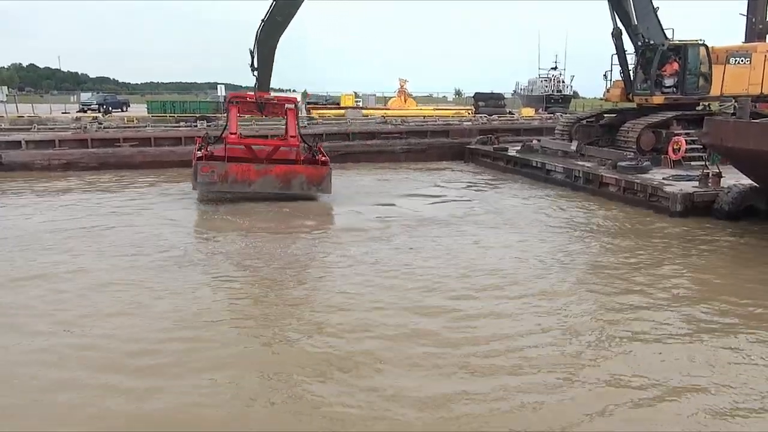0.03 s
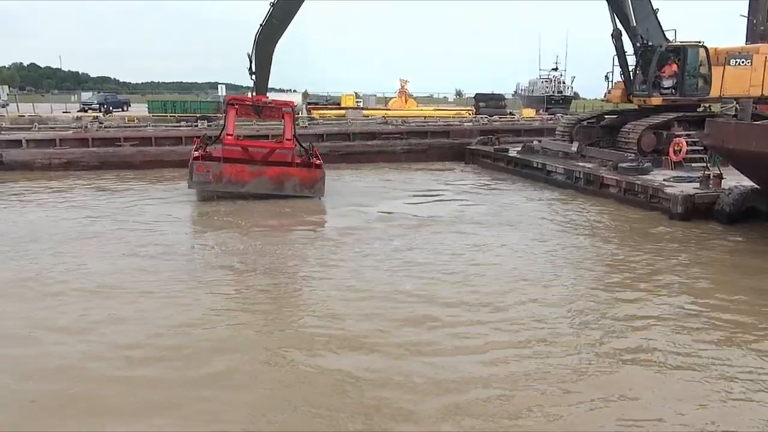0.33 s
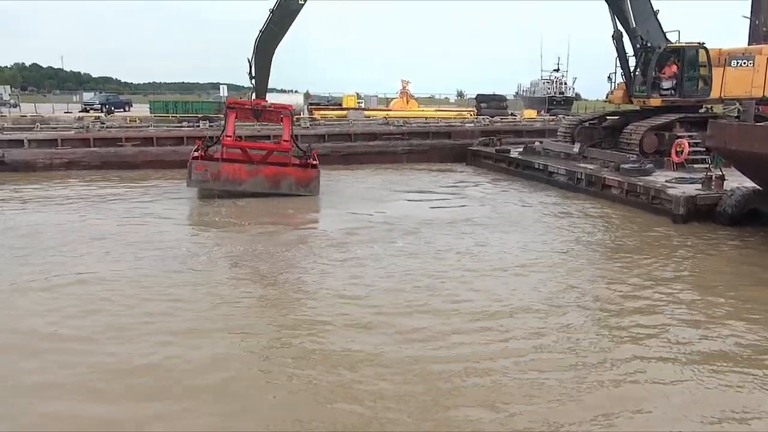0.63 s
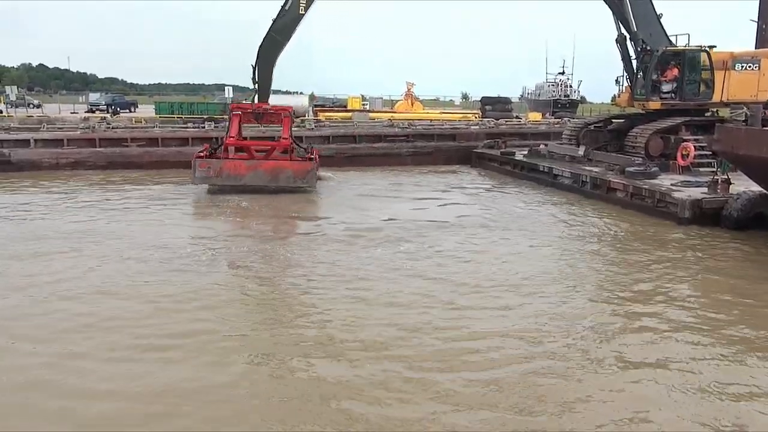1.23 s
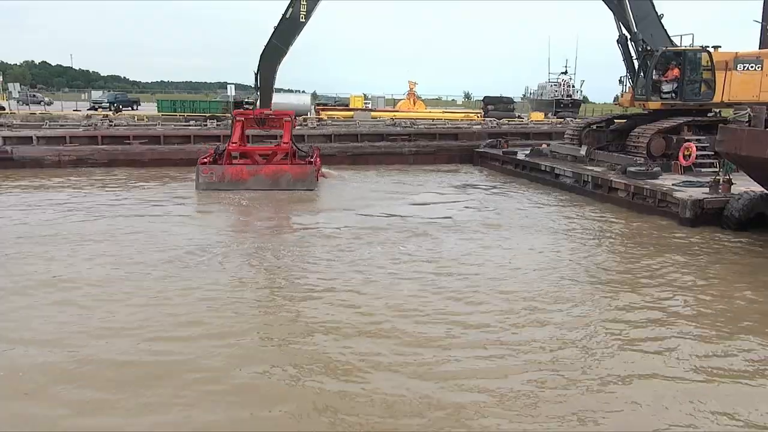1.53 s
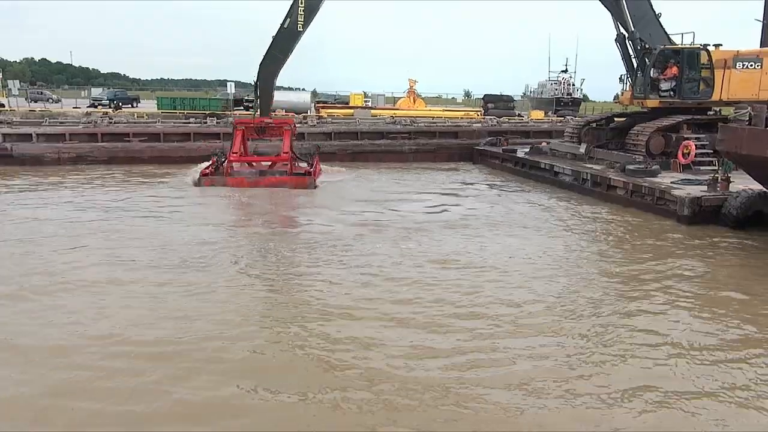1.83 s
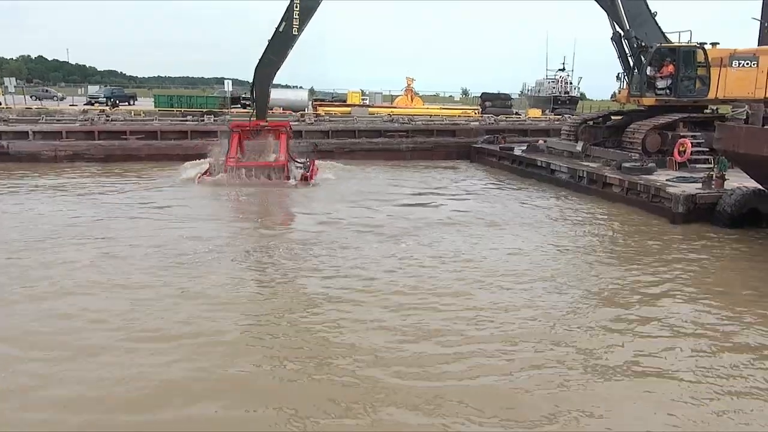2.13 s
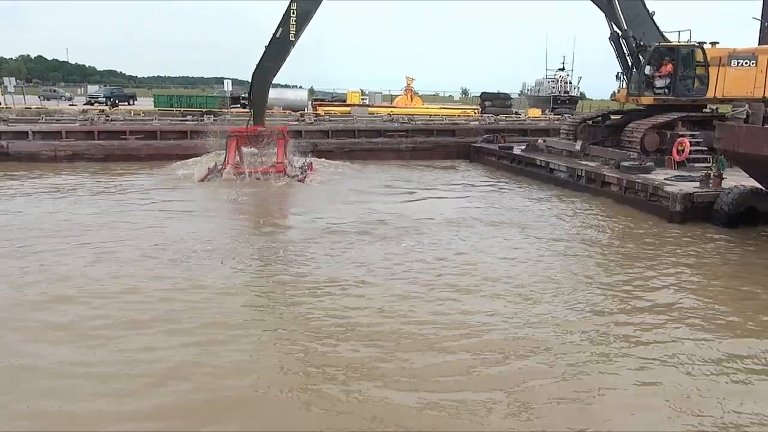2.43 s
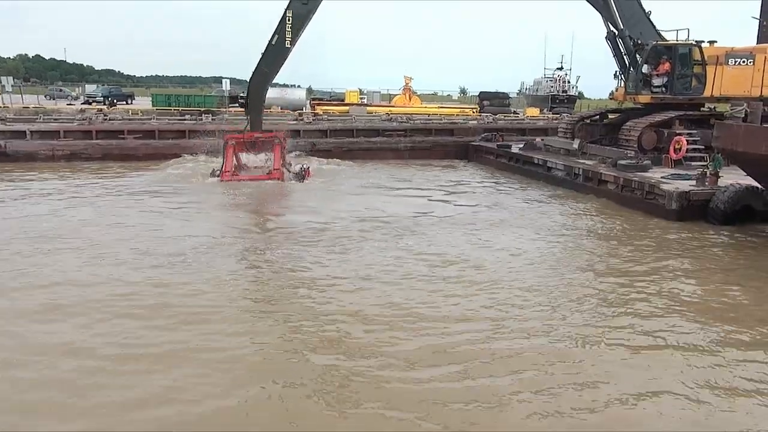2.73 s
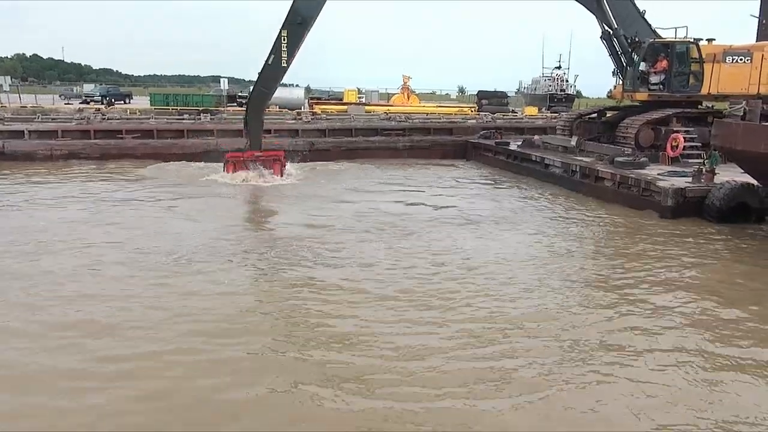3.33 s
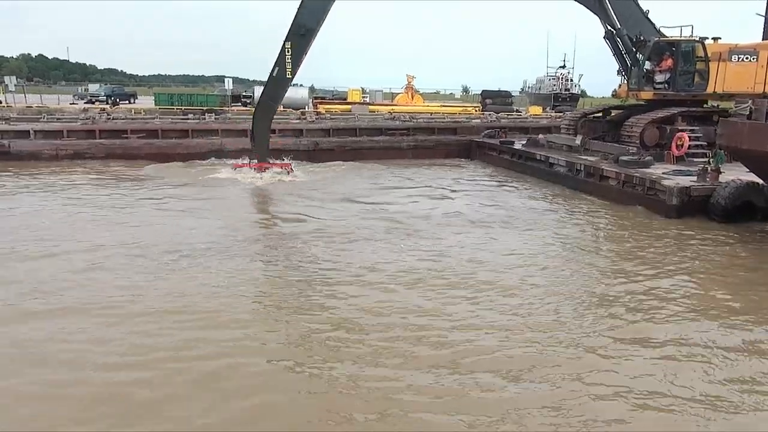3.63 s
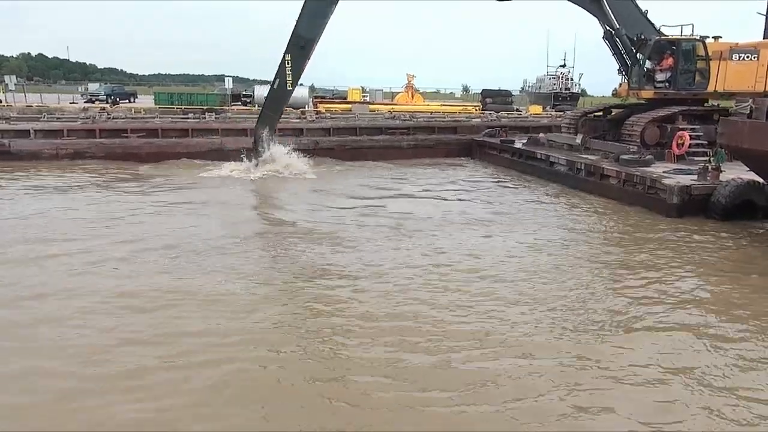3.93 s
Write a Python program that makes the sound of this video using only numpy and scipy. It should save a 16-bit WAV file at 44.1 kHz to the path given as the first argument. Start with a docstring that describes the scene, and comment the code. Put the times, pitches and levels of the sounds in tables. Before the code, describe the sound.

An excavator engine drones steadily across the water throughout, with a fan hum and a thin, wavering hydraulic whine. At about 2 seconds its bucket slaps the surface with a rush of spray. The water churns and bubbles softly, then gives a hollow, splashing gulp near 3.2 seconds and a smaller surge around 3.8. Light wind rumbles on the dull microphone, with a few soft low thumps.

```python
"""An excavator on a barge lowers its dredging bucket into a harbour, heard from across the water.
One slowly rising engine speed drives the exhaust drone, the fan hum and the hydraulic pump's whine.
About two seconds in the bucket slaps the surface, and a second later it gulps as it goes under:
spray rushes, bubbles and trapped air ring. A light wind rumbles on the dull stereo camera microphone."""
import sys
import numpy as np
from scipy import signal
from scipy.fft import rfft, irfft
from scipy.io import wavfile
from scipy.ndimage import uniform_filter1d

SR = 44100
rng = np.random.default_rng(int(sys.argv[2]) if len(sys.argv) > 2 else 0)


def file_out(sig):
    """Save sig as 16-bit WAV at sys.argv[1]."""
    # one column per channel
    cols = np.atleast_2d(sig).T
    # limit, then scale
    lim = np.clip(cols, -1, 1)
    pcm = np.round(lim * 32767).astype(np.int16)
    wavfile.write(sys.argv[1], SR, pcm)


N = 176400
T = np.arange(N) / SR
HZ = np.fft.rfftfreq(N, 1 / SR)

# left-right likeness of sound arriving over the water: f/Hz, coherence/0-1
AIR_COHERENCE = [(100, .85), (180, .85), (320, .94), (550, .98), (900, .99), (1600, .96), (2600, .55),
                 (6000, .4), (12000, .2)]
# spray off the bucket: f/Hz, relative density/dB
SPRAY_SPECTRUM = [(60, -50), (180, -48), (400, -58), (800, -59), (1400, -66.5), (2500, -74.5), (4000, -77),
                  (6000, -77), (8000, -86.5), (14000, -93)]


def amp(db):
    """Decibels to gain."""
    return 10 ** (np.asarray(db) / 20)


def unit(x):
    """Scales to rms 1."""
    return x / np.sqrt(np.mean(x ** 2) + 1e-20)


def curve(points, column=1):
    """One column of a time table at every sample."""
    table = np.array(points)
    return np.interp(T, table[:, 0], table[:, column])


def colour(points, hz, column=1):
    """One column of a frequency table, interpolated on a log axis."""
    table = np.array(points)
    return np.interp(np.log(hz + 1), np.log(table[:, 0] + 1), table[:, column])


def wander(rate_hz):
    """Random drift of rms 1, mostly slower than rate_hz."""
    return unit(irfft(rfft(rng.standard_normal(N)) * (HZ > 0) / (1 + (HZ / rate_hz) ** 2), N))


def noise(spectrum, coherence, patchy_db):
    """Stereo noise of a given spectrum, flickering in patches of time and frequency."""
    cells = signal.stft(rng.standard_normal((2, N)), nperseg=512)[2]
    patches = uniform_filter1d(rng.standard_normal(cells.shape[1:]), size=6, axis=0)
    patches = unit(uniform_filter1d(patches, size=8, axis=1))
    left, other = rfft(signal.istft(cells * amp(patchy_db * patches), nperseg=512)[1][:, :N])
    alike = colour(coherence, HZ)
    right = alike * left + np.sqrt(1 - alike ** 2) * other
    return irfft(np.array([left, right]) * amp(colour(spectrum, HZ)), N) * np.sqrt(SR / 2)


def partial(cycles, level_db, fade_db, fade_hz, rough, rough_hz):
    """A machine tone with a rough skirt, fading in and out over the water."""
    skirt = 1 + rough * (wander(rough_hz) + 1j * wander(rough_hz))
    tone = skirt * np.exp(2j * np.pi * (cycles + rng.random()))
    return np.sqrt(2) * tone.real * amp(level_db + fade_db * wander(fade_hz))


def burst(swell, resonances):
    """A swell of turbulence through resonances: f/Hz, width/Hz, level/dB."""
    body = sum(amp(db) / (1 + (2 * (HZ - centre) / width) ** 2) for centre, width, db in resonances)
    ring = irfft(rfft(rng.standard_normal(N)) * body, N) * swell
    return ring * np.linalg.norm(swell) / np.linalg.norm(ring)


def exhaust(firings):
    """The engine's firing drone, with a half order from uneven cylinders."""
    # drone: t/s, level/dB
    drone_level = [(0, -18), (.4, -17.5), (1.3, -15.5), (1.5, -18.5), (2.2, -19), (2.6, -21), (3.05, -22),
                   (3.35, -21), (3.68, -27), (3.85, -29.5), (3.96, -19), (4, -19)]
    # exhaust partials: multiple of the firing rate, level re drone/dB
    orders = [(1, 2), (2, -22.5), (3, -22), (4, -35)]
    drone = sum(partial(k * firings, curve(drone_level) + db,
                        fade_db=0.87, fade_hz=8.5, rough=0.057, rough_hz=4.6) for k, db in orders)
    return drone + partial(firings / 2, level_db=-30.5, fade_db=4.5, fade_hz=1.1, rough=0.041, rough_hz=1.8)


def gear(firings):
    """A thin gear whine that fades with the load."""
    # whine: t/s, level/dB
    whine_level = [(0, -47.5), (.35, -43.5), (.85, -64), (1.25, -46.5), (2, -63.5), (4, -55.5)]
    return partial(19 * firings, curve(whine_level), fade_db=1, fade_hz=3, rough=0.12, rough_hz=6)


def fan(blade_passes):
    """Blade hum that beats against the drone."""
    # hum: t/s, level at the blade rate/dB, level at twice that rate/dB
    hum_levels = [(0, -36.5, -33.5), (.35, -28, -36), (.8, -24, -35), (1.5, -40.5, -44), (2.1, -29, -26),
                  (2.55, -26, -37.5), (3.0, -31.5, -30.5), (3.4, -34, -32), (4, -32, -58.5)]
    # upper partials: multiple of the blade rate, level/dB
    overtones = [(3, -43), (4, -47)]
    hum = sum(partial(k * blade_passes, curve(hum_levels, column=k),
                      fade_db=0.96, fade_hz=1.1, rough=0.066 * k, rough_hz=2.4) for k in (1, 2))
    return hum + sum(partial(k * blade_passes, db, fade_db=2.5, fade_hz=0.28, rough=0.37, rough_hz=11)
                     for k, db in overtones)


def pump(strokes):
    """Piston whine of the hydraulics; its colour changes as the water takes the bucket's weight."""
    # leading partials: t/s, level of the second/dB, of the fourth/dB, of the sixth/dB
    whine_levels = [(0, -31.5, -36.5, -49.5), (.28, -32, -41, -53.5), (.48, -33, -35, -53),
                    (.75, -41.5, -37.5, -49.5), (.9, -36.5, -46.5, -50), (1.1, -34, -35.5, -44.5),
                    (1.3, -37.5, -36, -50.5), (1.6, -43, -45, -56), (1.95, -42.5, -40.5, -40),
                    (2.5, -47, -34, -45.5), (2.9, -45, -36, -48.5), (3.3, -46.5, -35.5, -50.5),
                    (3.7, -40, -38, -57), (4, -45, -32, -58)]
    # weaker partials: multiple of the piston rate, level with the bucket in air/dB, in water/dB
    weak_partials = [(1, -42.5, -39), (5, -47, -52.5), (7, -51, -59.5), (8, -55.5, -82), (12, -61.5, -62.5)]
    unloading_s = (0.67, 2.5)
    whine = sum(partial(2 * k * strokes, curve(whine_levels, column=k),
                        fade_db=0.58, fade_hz=10, rough=0.19, rough_hz=6) for k in (1, 2, 3))
    return whine + sum(partial(k * strokes, np.interp(T, unloading_s, [air_db, water_db]),
                               fade_db=2.5, fade_hz=3.7, rough=0.12, rough_hz=5.9)
                       for k, air_db, water_db in weak_partials)


def hiss():
    """A smooth hiss in the distance."""
    # hiss colour: f/Hz, relative density/dB
    spectrum = [(1000, -95), (2500, -83), (4000, -84), (6000, -88.5), (14000, -94)]
    # slow swell: t/s, gain/dB
    swell = [(0, 2.5), (.6, -0.5), (1.5, 2.5), (2.5, 2), (4, 1.5)]
    return noise(spectrum, AIR_COHERENCE, patchy_db=0.8) * amp(curve(swell))


def roar(firings, throb_depth=0.24):
    """Broad machine noise from the barge, throbbing with each firing."""
    # machine noise: f/Hz, relative density/dB
    spectrum = [(60, -52.5), (130, -51), (240, -57), (320, -51.5), (400, -63.5), (480, -65), (850, -63),
                (1100, -64), (1500, -70), (2000, -73), (2800, -88.5), (5000, -110)]
    # slow swell: t/s, gain/dB
    swell = [(0, 0.5), (.5, 0), (1.6, 0.5), (2.5, 0.5), (3.3, 1.5), (4, 1)]
    throb = 1 + throb_depth * np.cos(2 * np.pi * firings)
    return noise(spectrum, AIR_COHERENCE, patchy_db=0.78) * throb * amp(curve(swell))


def wind(gust_db=1, sides_db=(1.5, 3.5)):
    """Lumpy rumble of wind right on the microphone, stronger at the right port."""
    # rumble: f/Hz, relative density/dB
    spectrum = [(5, -68), (12, -47), (22, -40.5), (40, -42), (70, -46), (110, -51), (250, -70), (800, -120)]
    rumble = noise(spectrum, coherence=[(30, 0.5)], patchy_db=0)
    return rumble * amp(gust_db * wander(rate_hz=15)) * amp(sides_db)[:, None]


def whistles(strokes):
    """Thin hydraulic tones that come and go as the boom moves."""
    # whistles: peak t/s, half length/s, multiple of the piston rate, level/dB
    swells = [(0.837, .08, 10, -56.5), (1.045, 0.41, 3, -40), (1.028, 0.091, 10, -47),
              (1.531, 0.12, 10.7, -58), (2.249, 0.36, 5, -48.5), (3.925, .15, 5, -46.5)]
    return sum(partial(k * strokes, db, fade_db=1, fade_hz=5, rough=0.35, rough_hz=13)
               * np.exp(-((T - at) / half) ** 2) for at, half, k, db in swells)


def buffets(width_s=0.0064, sides_db=(-5.5, 3)):
    """Short low thumps of air on the microphone: a push with a rebound on either side."""
    # buffets: t/s, relative level/dB
    hits = [(1.273, -7.5), (2.135, -12), (2.809, -11), (3.367, -10), (3.735, -10.5), (3.96, -9.5)]
    thumps = np.zeros(N)
    for at, db in hits:
        offset = (T - at) / width_s
        thumps += amp(db) * (1 - 2 * offset ** 2) * np.exp(-offset ** 2)
    return thumps * amp(sides_db)[:, None]


def bubbles(per_s=1000, low_hz=350, high_hz=1700, sizes=24, decay_cycles=7, glide=0.13, spread_db=0.5):
    """Bubbles of many sizes, each a short ring that rises in pitch."""
    out = np.zeros(N)
    for hz in np.geomspace(low_hz, high_hz, sizes):
        age = T[:SR // 10] * hz / decay_cycles
        ring = np.exp(-age) * np.sin(2 * np.pi * decay_cycles * age * (1 + glide * age))
        births = rng.random(N) < per_s / sizes / SR
        strength = amp(spread_db * np.minimum(rng.exponential(1, N), 3))
        out += signal.oaconvolve(births * strength, ring)[:N]
    return unit(out)


def churn():
    """Spray and bubbles well up as the bucket sinks."""
    # water churning round the bucket: t/s, gain/dB
    surge = [(1.8, -24.5), (1.885, -7.5), (1.925, -1), (2.0, -1.5), (2.04, 0), (2.08, 3), (2.125, 0.5),
             (2.15, -5), (2.2, -3.5), (2.25, -9.5), (2.7, -13), (3.1, -11), (3.22, -11.5), (3.35, -11),
             (3.55, -20.5), (3.78, -8.5), (4, -20.5)]
    spray = noise(SPRAY_SPECTRUM, AIR_COHERENCE, patchy_db=4.5)
    return amp(curve(surge)) * (spray + amp(-39.5) * bubbles())


def slaps(push_hz=205, push_width_hz=120):
    """Water closes on the bucket: the hollow ring of trapped air, a low push and a rush of spray."""
    # slaps and gulps: peak t/s, ring/dB, rise/s, decay/s, air pocket f/Hz, spray gain/dB, push/dB
    splashes = [(2.095, -13.5, .009, 0.0056, 803, 6, -17), (2.195, -28, 0.0096, 0.03, 726, 2, -35.5),
                (3.169, -21.5, 0.0037, 0.0037, 825, -6.5, -37), (3.182, -16, 0.0034, 0.0096, 844, 8.5, -41),
                (3.196, -16.5, 0.0028, 0.016, 797, -1.5, -25.5),
                (3.222, -22, 0.0054, 0.014, 773, -2, -32.5)]
    # air pocket resonances: ratio to its pitch, width/Hz, relative level/dB
    pocket = [(.68, 91, -11.5), (0.883, 89.4, -2.5), (1.018, 107.4, 6.5), (1.7, 293, -7), (2.4, 198, -16)]
    out = np.zeros((2, N))
    spray = noise(SPRAY_SPECTRUM, AIR_COHERENCE, patchy_db=2)
    for at, ring_db, rise, decay, pitch, spray_db, push_db in splashes:
        swell = np.exp(-np.maximum((at - T) / rise, (T - at) / decay))
        out += amp(ring_db) * burst(swell, [(ratio * pitch, width, db) for ratio, width, db in pocket])
        out += amp(push_db) * burst(swell, [(push_hz, push_width_hz, 0)])
        out += amp(spray_db) * swell * spray
    return out


def scene():
    """Excavator and bucket out on the harbour, wind close on the microphone."""
    # engine speed: t/s, firing rate/Hz
    firing_rate = [(0, 89.3), (.14, 89.45), (.34, 90.95), (.8, 91.05), (1.2, 91.25), (1.6, 90.9),
                   (2.3, 91.7), (3.1, 91.9), (3.65, 93.0), (4, 92.4)]
    firings = np.cumsum(curve(firing_rate)) / SR
    blade_passes, strokes = 1.143 * firings, 3.228 * firings
    tones = exhaust(firings) + gear(firings) + fan(blade_passes) + pump(strokes) + whistles(strokes)
    return tones + hiss() + roar(firings) + churn() + slaps() + wind() + buffets()


def record(dry, fade_s=0.008, cutoff_hz=15700):
    """The camera microphone: two dull, unequal ports, short fades at the ends and a band limit."""
    # port response: f/Hz, left gain/dB, right gain/dB
    response = [(101, -3.5, -2.5), (400, -1, -1), (910, -1, -2), (1340, -0.5, -4.5), (2022, -4, -16.5),
                (2470, -14, -11.5), (3780, -18.5, -5), (4244, -20, -12), (4600, -31.5, -38),
                (4640, -26, -25), (5870, -21, -12), (6640, -35, -37.5), (7850, -35.5, -35),
                (8650, -31.5, -25), (15000, -15.5, -22)]
    # phase between the ports: f/Hz, lead of the left/rad
    left_lead = [(100, 0), (900, -.08), (1250, -.15), (1550, -.3), (1810, -.9), (2240, -2.7), (2800, -3.7),
                 (6000, -4.6)]
    hz = np.fft.rfftfreq(2 * N, 1 / SR)
    gains = amp([colour(response, hz, column=1), colour(response, hz, column=2)])
    phases = np.exp(0.5j * np.outer([1, -1], colour(left_lead, hz)))
    mirrored = np.hstack([dry, dry[:, ::-1]])  # keeps the end from wrapping into the start
    heard = irfft(rfft(mirrored) * gains * phases)[:, :N]
    fades = np.sin(np.pi / 2 * np.minimum(np.minimum(T, T[::-1]) / fade_s, 1)) ** 2
    lowpass = signal.firwin(511, cutoff_hz, window=("kaiser", 9), fs=SR)
    return signal.oaconvolve(heard * fades, lowpass[None], "same")


dry = scene()
out = record(dry)
file_out(out)
```